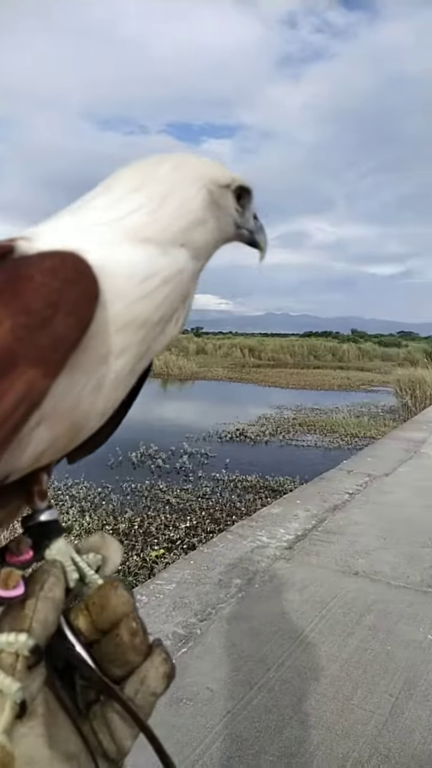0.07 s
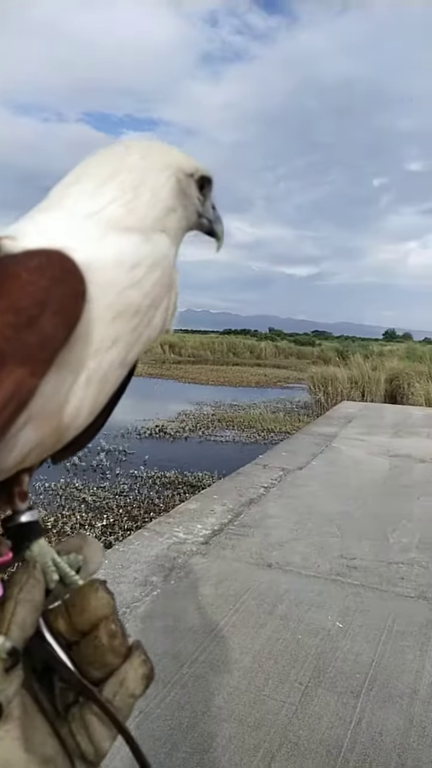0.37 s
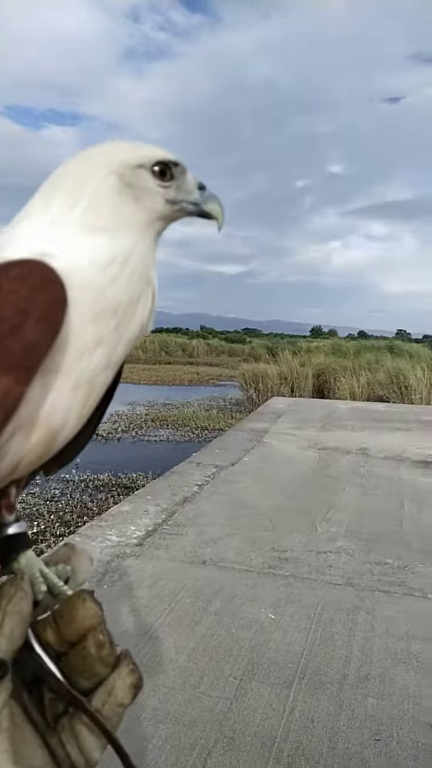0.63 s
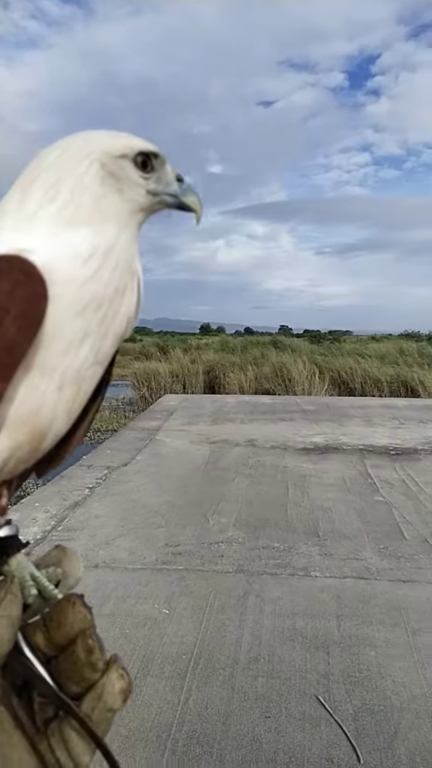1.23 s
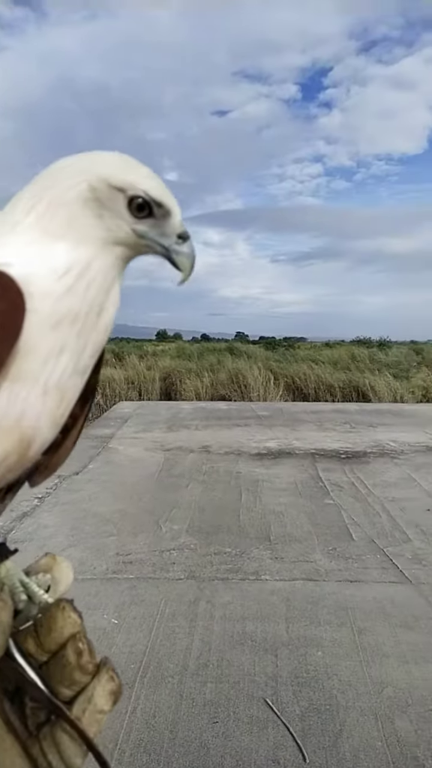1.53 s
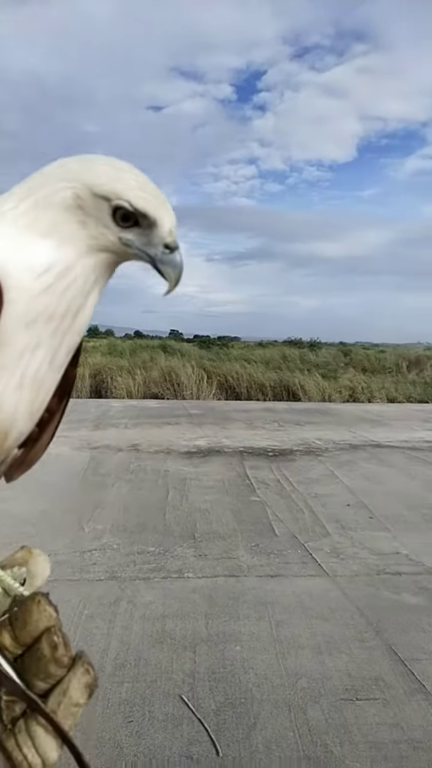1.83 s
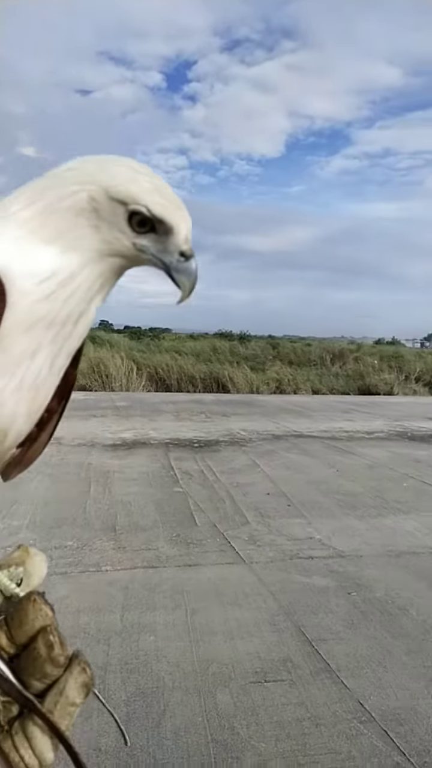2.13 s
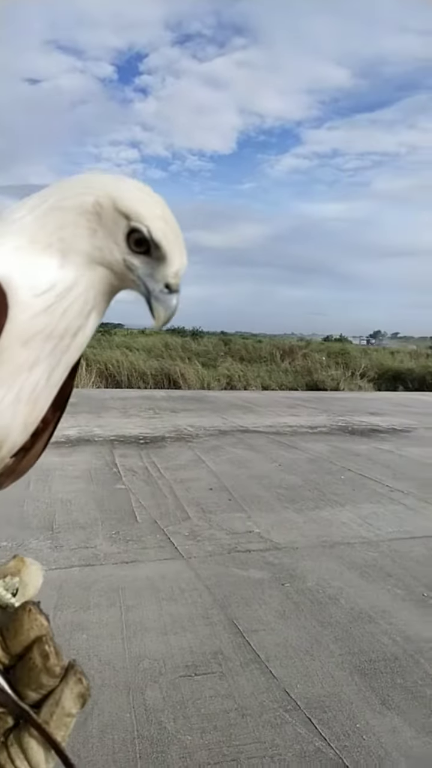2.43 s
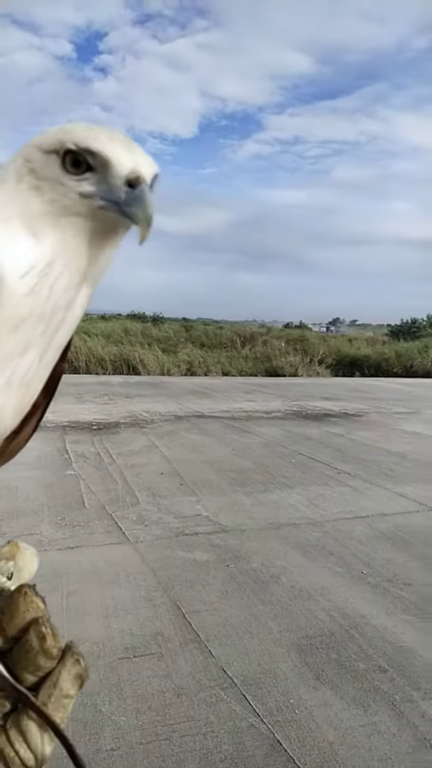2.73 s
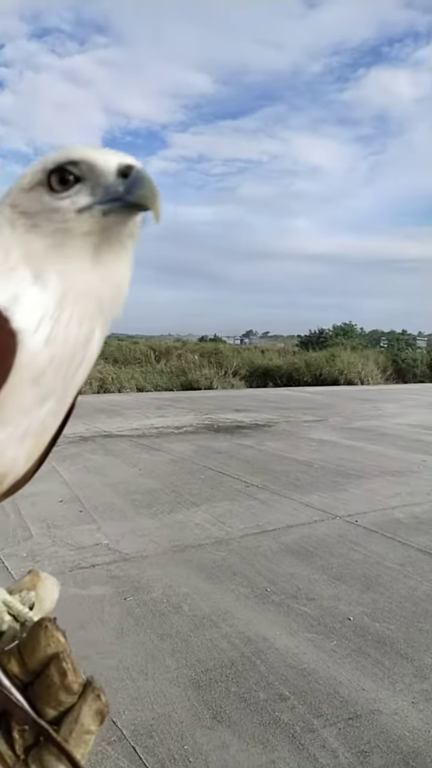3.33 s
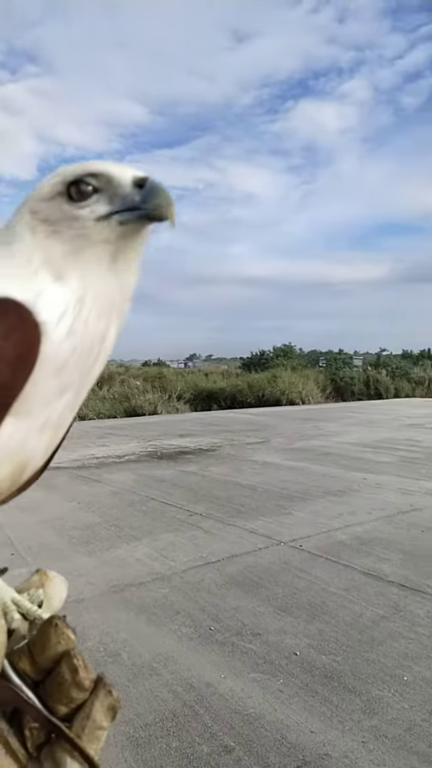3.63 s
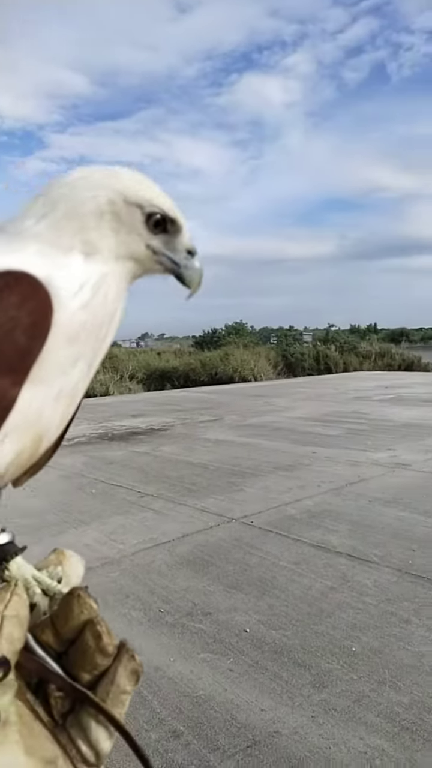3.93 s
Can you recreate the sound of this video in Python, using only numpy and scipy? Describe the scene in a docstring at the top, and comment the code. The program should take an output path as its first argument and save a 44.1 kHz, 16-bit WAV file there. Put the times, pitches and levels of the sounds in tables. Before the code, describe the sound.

Quick songbird chirps and two falling trills sound on open ground by a marsh, with far birds and faint insect hiss behind. Soft wind thumps the microphone, a brief close creak ends in a snap, and the chirping returns.

```python
"""Songbird beside a marsh

Open ground, light wind rumbling and thumping softly on the microphone. A small songbird whistles three
quick arched phrases and a second bird gives two falling trills. Far birds trill, whistle and hoot,
blurred by distance, and insects hiss in the grass. Close by, something (perhaps a leather glove) creaks
in a run of slips, snaps and scuffs."""
import sys
import numpy as np
from scipy import signal
from scipy.fft import rfft, irfft
from scipy.io import wavfile

SR = 44100
rng = np.random.default_rng(int(sys.argv[2]) if len(sys.argv) > 2 else 0)


def pcm_store(signal):
    """Save signal as 16-bit PCM."""
    levels = np.round(np.clip(np.atleast_2d(signal), -1, 1) * 32767)
    wavfile.write(sys.argv[1], SR, levels.astype(np.int16).T)


N = 176400
T = np.arange(N) / SR
PITCH_WOBBLE = 0.0084   # share by which a whistled pitch wavers
FAR_LAG_S = .00018      # far birds reach the left microphone this much later


def from_db(db):
    """Decibels to gain."""
    return 10 ** (np.asarray(db) / 20)


def rms_one(x):
    """Scale to unit rms."""
    return x / np.sqrt(np.mean(x ** 2) + 1e-20)


def level(rows):
    """Gain that follows points of (time [s], level [dB])."""
    return from_db(np.interp(T, *np.transpose(rows)))


def drift(hz):
    """Random wander of unit spread, mostly slower than hz."""
    r = np.exp(-2 * np.pi * hz / SR)
    return rms_one(signal.lfilter([1], [1, -2 * r, r * r], rng.standard_normal(N + SR))[SR:])


def noise(spectrum, alike, apart_hz=SR):
    """Stereo noise of a given colour, falling steeply outside it; the sides grow unlike above apart_hz."""
    hz, db = np.transpose(spectrum)
    f = np.maximum(np.arange(N // 2 + 1) * SR / N, 1)
    skirts = np.minimum(1, np.minimum(f / hz[0], hz[-1] / f)) ** 4
    gain = from_db(np.interp(np.log(f), np.log(hz), db)) * skirts
    mid, side = rfft(rng.standard_normal((2, N))) * gain
    alike = np.clip(alike, -1, 1) / (1 + (f / apart_hz) ** 2)
    return rms_one(irfft(np.sqrt(1 + alike) * mid + np.sqrt(1 - alike) * side * [[1], [-1]], N))


def place(x, pan_db, lag_s=0):
    """Give a sound a direction: left minus right level, and the lag at the left microphone."""
    left, right = np.broadcast_to(x, (2, N))
    return np.array([np.interp(T - lag_s, T, left), right]) * from_db([[pan_db / 2], [-pan_db / 2]])


def gate(s, length, edge):
    """Smooth attack, hold and release."""
    return np.sin(np.pi / 2 * np.clip(np.minimum(T - s, s + length - T) / edge, 0, 1)) ** 2


def echo(x, db, t60_s=0.24):
    """Diffuse scatter from reeds and ground: ten feedback delays a side."""
    size = N + SR
    w = 2 * np.pi * np.arange(size // 2 + 1) / size
    spectrum, sides = rfft(x, size), []
    for lags in rng.uniform(.012, 0.083, (2, 10)):
        loops = [from_db(-60 * d / t60_s) * np.exp(-1j * w * int(d * SR)) for d in lags]
        sides.append(irfft(spectrum * sum(g / (1 - g) for g in loops), size)[:N])
    return from_db(db) * rms_one(np.array(sides)) * x.std()


def struck(hits, modes, vary_db=2.5):
    """Each hit rings the damped modes, each with a strength of its own."""
    s, db = np.transpose(hits)
    out = np.zeros(N)
    for k, (hz, mode_db, t60) in enumerate(modes):
        clicks = np.full(N, 1e-18)
        clicks[(s * SR).astype(int)] = from_db(db + mode_db + vary_db * rng.standard_normal(len(s)))
        r, w = from_db(-60 / (t60 * SR)), 2 * np.pi * hz / SR
        out += (-1) ** k * signal.lfilter([0, np.sin(w)], [1, -2 * r * np.cos(w), r * r], clicks)
    return out


def tone(hz):
    """A sine of unit rms that follows a pitch."""
    return np.sqrt(2) * np.sin(2 * np.pi * np.cumsum(hz) / SR)


def blurred_tone(hz, width_hz, order=4):
    """A tone whose strength and phase are scattered on the long way to the microphone."""
    lowpass = signal.butter(order, width_hz / 2, fs=SR, output="sos")
    blur = signal.sosfilt(lowpass, rng.standard_normal((2, N)))
    phase = 2 * np.pi * np.cumsum(hz + np.zeros(N)) / SR
    return rms_one(blur[0] * np.cos(phase) + blur[1] * np.sin(phase))


def wind():
    """Lumpy low turbulence on the microphone, shifting between its two ports."""
    colour = [(25, -25), (40, -24.5), (63, -3), (80, -2.5), (105, 4), (170, -9), (250, -19), (330, -29),
              (480, -42)]   # rumble: (frequency [Hz], level [dB])
    gusts = [(0.0, -67), (0.04, -51), (0.22, -65.5), (0.32, -46), (0.49, -61), (0.56, -42), (0.78, -50.5),
             (0.81, -43.5), (0.86, -49), (1.12, -50), (1.17, -46), (1.24, -54), (1.3, -40.5), (1.45, -44.5),
             (1.47, -38), (1.53, -46), (1.63, -38.5), (1.66, -49), (2.38, -52.5), (2.51, -43.5),
             (2.75, -53), (2.87, -47), (2.93, -49.5), (3.14, -42), (3.73, -46), (3.88, -53.5),
             (3.91, -44.5), (4.0, -54)]   # wind strength: (time [s], level [dB])
    balance = [(0.0, -1.5), (0.61, 6.5), (1.45, 4), (1.63, 15.0), (1.66, 0), (2.43, 0), (2.51, 6.5),
               (4.0, 7)]   # side of the wind: (time [s], left minus right [dB])
    lumps = rms_one(from_db(drift(17)))
    rumble = noise(colour, alike=0.79) * lumps * level(gusts) * from_db(0.03)
    side = np.sqrt(level(balance))
    return place(rumble, pan_db=0, lag_s=.0002) * [side, 1 / side]


def marsh_air():
    """The far background of the marsh, whose middle bands swell and fade apart."""
    colour = [(300, 3), (420, -2), (560, -2), (700, 4.5), (900, -3), (1150, -8), (1600, -12), (2100, -9.5),
              (2800, -15), (4600, -16), (5900, -48), (7500, -49), (9500, -27)]   # background: (frequency [Hz], level [dB])
    swell = [(0, -61.5), (1.2, -67), (1.8, -67), (2.1, -61.5), (2.5, -65), (2.85, -63), (3.2, -65),
             (4, -62)]   # its strength: (time [s], level [dB])
    air = noise(colour, alike=0.27, apart_hz=1800)
    spectrum, f = rfft(air), np.arange(N // 2 + 1) * SR / N
    edges_hz = np.geomspace(450, 5000, 15)
    for low, high in zip(edges_hz, edges_hz[1:]):
        band = irfft(spectrum * ((f >= low) & (f < high)), N)
        air += band * (rms_one(from_db(3.5 * drift(9.5))) - 1)
    return air * level(swell)


def microphone_hiss():
    """The microphone's own faint, flickering hiss."""
    colour = [(5000, -0.5), (7500, -10.5), (10500, -6.5), (12000, -10), (15500, -9)]   # hiss: (frequency [Hz], level [dB])
    return noise(colour, alike=0) * from_db(-81.5 + 2.2 * drift(42))


def insects():
    """A fluttering hiss in the grass to the right, with one shrill insect ringing through it."""
    colour = [(6100, -17), (6650, -4.5), (7150, 2.5), (8000, 1.5), (9000, -7.5), (10000, -47)]   # chorus: (frequency [Hz], level [dB])
    swell = [(0.0, -64), (0.35, -65.5), (0.6, -68.5), (1.11, -69.5), (2.13, -74.5), (2.18, -67.5),
             (2.28, -75), (4.0, -76)]   # its strength: (time [s], relative level [dB])
    ring_swell = [(0, -77), (.42, -76.5), (.55, -69.5), (.7, -72), (.78, -79.5), (.92, -72), (1.05, -86.5),
                  (4, -87.5)]   # the shrillest insect: (time [s], level [dB])
    chorus = noise(colour, alike=0.11) * level(swell) * from_db(-5 + 1.56 * drift(23))
    ring = level(ring_swell) * from_db(2 * drift(39)) * blurred_tone(7160, width_hz=430, order=2)
    return place(chorus + ring, pan_db=-12)


def brushes():
    """Soft low brushes of handling noise, dead centre."""
    strokes = [(-.03, 0.11, -57), (0.03, 0.56, -63), (1.595, 0.095, -54.5), (2.489, 0.11, -59.5)]   # brushes: (time [s], length [s], level [dB])
    colour = [(200, 11.5), (290, 2.5), (500, -1.5), (700, -48.5)]   # their spectrum: (frequency [Hz], level [dB])
    envelope = sum(from_db(db) * gate(s, length, length / 3) for s, length, db in strokes)
    return noise(colour, alike=1.0) * envelope


def songbird():
    """Nearly pure whistles, each bending through three pitches; higher notes favour the right side."""
    # slurred notes: (time [s], length [s], start pitch [Hz], middle [Hz], end [Hz], level [dB])
    notes = [(.025, 0.019, 3380, 3000, 3400, -53), (.057, .015, 1680, 1920, 2330, -58),
             (.070, .011, 2320, 2540, 2700, -50), (0.085, 0.0099, 3080, 3220, 3370, -48.5),
             (0.097, 0.016, 3600, 3720, 3800, -52.5), (0.116, 0.013, 4170, 4200, 4000, -60),
             (0.144, 0.011, 4070, 3423, 3320, -49), (0.152, 0.02, 3260, 3356, 3820, -48.5),
             (0.173, 0.012, 3860, 3930, 3670, -61), (0.186, 0.015, 3500, 3760, 3600, -62.5),
             (2.969, 0.025, 2110, 2550, 2240, -54), (3.059, 0.0054, 3700, 3420, 3230, -43),
             (3.064, 0.014, 3570, 3620, 2930, -47), (3.069, 0.014, 3280, 2930, 2630, -49.5),
             (3.082, .028, 2650, 2105, 1970, -50.5), (3.11, 0.0182, 2140, 2475, 2600, -49.5),
             (3.357, 0.006, 2720, 3170, 3500, -57.5), (3.361, 0.022, 3570, 3610, 3540, -54),
             (3.593, 0.02, 2380, 2703, 2660, -47), (3.728, 0.0062, 4520, 4150, 3850, -47),
             (3.737, 0.0093, 3700, 3340, 3050, -41.5), (3.746, 0.026, 3100, 2250, 2160, -48.5),
             (3.768, 0.029, 2270, 2626, 2710, -49.5)]
    pips = [(2.999, 3230, -56), (3.013, 3180, -49), (3.03, 3600, -52), (3.045, 3670, -51.5),
            (3.62, 3400, -52), (3.634, 3570, -55), (3.651, 3900, -51), (3.666, 4080, -44.5),
            (3.683, 4460, -47.5), (3.699, 4450, -49.5), (3.715, 4710, -56.5)]   # short arched notes of the trills: (time [s], pitch [Hz], level [dB])
    pip_s, fall_hz, arch_hz, edge_s = 0.0083, 140, 200, 0.0032
    pan_db_per_khz, centre_hz = -3.5, 3280
    arches = [(s, pip_s, hz + (fall_hz - arch_hz) / 2, hz + arch_hz / 2, hz - (fall_hz + arch_hz) / 2, db)
              for s, hz, db in pips]
    song, wobble = np.zeros((2, N)), 1 + PITCH_WOBBLE * drift(380)
    for s, length, first, middle, last, db in notes + arches:
        u = np.linspace(0, 1, int(length * SR))
        span = int(s * SR) + np.arange(len(u))
        hz = np.polyval(np.polyfit([0, .5, 1], [first, middle, last], 2), u) * wobble[span]
        envelope = np.sin(np.pi / 2 * np.minimum(1, np.minimum(u, 1 - u) * length / edge_s))
        side_db = pan_db_per_khz * (hz - centre_hz) / 1000
        song[:, span] += from_db(db + side_db * [[.5], [-.5]]) * envelope * tone(hz)
    song *= from_db(1.8 * drift(150))
    return place(song, pan_db=0.5, lag_s=0.00026) + echo(song.mean(0), db=-18)


def far_hoots():
    """Low hoots, blurred on their way across the marsh."""
    calls = [(0.134, 0.083, 845, -67.5), (0.344, 0.75, 859, -66), (0.512, 0.45, 761.5, -61),
             (1.043, 0.26, 721, -65), (1.345, 0.083, 779, -66.5), (1.443, 0.27, 804, -64),
             (1.646, 0.25, 795, -61.5), (2.402, 0.142, 741, -63.5), (2.64, 0.065, 720, -71),
             (3.128, 0.14, 640, -65.5), (3.807, 0.18, 1062, -70.5)]   # hoots: (time [s], length [s], pitch [Hz], level [dB])
    hoots = sum(from_db(db) * gate(s, length, length / 3) * blurred_tone(hz, width_hz=148)
                for s, length, hz, db in calls)
    return place(hoots, pan_db=-1)


def far_birds():
    """Gliding, pulsing trills blurred by distance, and one thin whistle."""
    # trills: (time [s], length [s], start pitch [Hz], end [Hz], level [dB], pulses [1/s], width [Hz])
    trills = [(0.219, .14, 1877, 1562, -66, 49, 348), (0.42, 0.15, 1580, 1800, -70.5, 50, 394),
              (0.693, 0.28, 4970, 3620, -76.5, 67, 1150), (0.903, 0.28, 4600, 4450, -70.5, 145, 1020),
              (1.161, 0.13, 4750, 4780, -69, 100, 710), (1.283, 0.063, 4680, 4900, -72, 75, 695),
              (1.345, 0.13, 2730, 3200, -67.5, 49, 294), (1.436, 0.056, 4400, 5050, -76.5, 49, 600),
              (1.579, 0.19, 4200, 3650, -75.5, 54, 600), (1.699, 0.044, 4820, 4900, -75.5, 70, 800),
              (1.822, 0.043, 4550, 4970, -76, 40, 900), (1.992, 0.083, 4550, 4130, -69.5, 64, 825),
              (2.024, 0.18, 3370, 3700, -69.5, 48, 200), (1.882, 0.71, 2228, 2208, -66, 44, 405),
              (2.591, 0.17, 4170, 3920, -74, 50, 1500), (2.667, 0.021, 2870, 3640, -56, 14, 250),
              (3.388, 0.071, 2066, 2490, -59.5, 44, 554), (3.506, 0.29, 4340, 4010, -67, 43, 1130),
              (3.501, 0.28, 2086, 2150, -65.5, 40, 295), (3.788, .22, 3450, 3920, -61, 52, 1520)]
    whistle = (3.11, .15, 1785, 1750, -67.5)   # (time [s], length [s], start pitch [Hz], end [Hz], level [dB])
    pace = np.cumsum(1 + .15 * drift(30)) / SR   # an unsteady clock for the pulses
    calls = np.zeros(N)
    for s, length, first, last, db, rate, width in trills:
        hz = np.interp(T, [s, s + length], [first, last])
        pulsing = 1 + .45 * np.sin(2 * np.pi * rate * pace)
        calls += from_db(db) * gate(s, length, length / 3) * pulsing * blurred_tone(hz, width)
    s, length, first, last, db = whistle
    hz = np.interp(T, [s, s + length], [first, last]) * (1 + PITCH_WOBBLE * drift(55.6))
    calls += from_db(db) * gate(s, length, length / 4) * tone(hz)
    return place(calls, pan_db=4, lag_s=FAR_LAG_S) + echo(calls, db=-13)


def wind_buffets():
    """Wind buffets thump softly on the left microphone, ringing two low modes."""
    buffets = [(.321, -43.5), (.555, -42.5), (.607, -48.5), (1.562, -40.5), (1.586, -51), (1.617, -33.5)]   # buffets: (time [s], level [dB])
    modes = [(109, -1.2, 0.045), (171, 0.29, 0.037)]   # resonances: (frequency [Hz], level [dB], t60 [s])
    soften = signal.butter(2, 330, fs=SR, output="sos")
    return place(signal.sosfilt(soften, struck(buffets, modes)), pan_db=22.5)


def falling_trills():
    """A second bird's runs of tiny pips sink to one pitch and trail off in the reeds."""
    runs = [(0.516, 0.086, -56), (0.763, 0.088, -54.5)]   # trills: (time [s], length [s], level [dB])
    from_hz, to_hz, settle_s, pulses_per_s, swing_hz = 2900, 2300, 0.02, 80, 60
    song = np.zeros(N)
    for s, length, db in runs:
        age = np.maximum(T - s, 0)
        beat = 2 * np.pi * pulses_per_s * age
        hz = to_hz + (from_hz - to_hz) * np.exp(-age / settle_s) + swing_hz * np.sin(beat)
        song += from_db(db) * gate(s, length, length / 6) * np.sin(beat / 2) ** 2 * tone(hz)
    return place(song + echo(song, db=-9), pan_db=6.5, lag_s=FAR_LAG_S)


def rustles():
    """Thin bright ticks and rustles near the microphone."""
    ticks = [(0.558, 0.0085, -59), (.562, 0.079, -72.5), (1.044, 0.005, -64), (3.015, 0.15, -74.5)]   # rustles: (time [s], length [s], level [dB])
    colour = [(5500, -15.5), (9000, -20), (15000, -27)]   # (frequency [Hz], level [dB])
    envelope = sum(from_db(db) * gate(s, length, length / 2) for s, length, db in ticks)
    return noise(colour, alike=0.3) * envelope


def creak_and_snap():
    """An even run of slips swells and fades over a rub of friction, then ends in a snap."""
    slips = [(1.876, -54), (1.8995, -48), (1.9237, -40.5), (1.9492, -39.5), (1.9732, -40), (1.9969, -37.5),
             (2.0207, -41), (2.0434, -38), (2.068, -45)]   # the creak: (time [s], level [dB])
    slip_modes = [(810, -7.5, 0.011), (1080, 1.5, 0.011), (1390, -12, 0.0079), (2170, -22, 0.027)]   # its resonances: (frequency [Hz], level [dB], t60 [s])
    snaps = [(2.1445, -43.5), (2.1618, -47), (2.1657, -27), (2.1725, -41), (2.2012, -46)]   # clicks of the snap: (time [s], level [dB])
    snap_modes = [(735, -13, 0.0077), (1050, 1, 0.012), (1240, 0, 0.0051), (1960, -3, 0.011)]   # their resonances: (frequency [Hz], level [dB], t60 [s])
    friction = [(850, 1), (1150, -14), (1450, -3)]   # rub between the slips: (frequency [Hz], level [dB])
    creak = np.zeros(N)
    for slip in slips:   # each catches at another spot and rings at slightly different pitches
        modes = [(hz * (1 + 0.056 * rng.standard_normal()), db, t60) for hz, db, t60 in slip_modes]
        creak += struck([slip], modes)
    start, length = slips[0][0], snaps[0][0] - slips[0][0]
    rub = from_db(-60.5) * gate(start, length, length / 2) * noise(friction, alike=0.92)[0]
    return creak + rub + struck(snaps, snap_modes)


def scuffs():
    """Two short, grainy rubs close to the microphone."""
    strokes = [(2.15, 0.068, -49, -0.0041), (3.211, 0.047, -54, .0003)]   # scuffs: (time [s], length [s], level [dB], lag on the left [s])
    colour = [(500, -5), (900, -0.5), (1500, -3.5), (2300, 8.5), (3000, -1.5), (5000, -4.5), (7000, -8.5),
              (8500, -35), (12000, -22)]   # their spectrum: (frequency [Hz], level [dB])
    rub = noise(colour, alike=0.12) * rms_one(from_db(3.2 * drift(200)))
    return sum(place(from_db(db) * gate(s, length, length / 3) * rub, pan_db=0.55, lag_s=lag)
               for s, length, db, lag in strokes)


def scene():
    """Wind, marsh, birds and close handling as they meet at the microphone."""
    breeze = wind() + wind_buffets()
    background = marsh_air() + microphone_hiss() + insects()
    birds = songbird() + far_hoots() + far_birds() + falling_trills()
    handling = brushes() + rustles()
    creak, scuff = creak_and_snap(), scuffs()
    close = place(creak, pan_db=2.6, lag_s=-0.00012) + scuff + echo(creak + scuff[0], db=-12.5)
    return breeze + background + birds + handling + close


def record(dry):
    """The recorder cuts the top steeply at 15.5 kHz."""
    return signal.sosfilt(signal.ellip(10, .1, 70, 15500, fs=SR, output="sos"), dry)


dry = scene()
out = record(dry)
pcm_store(out)
```